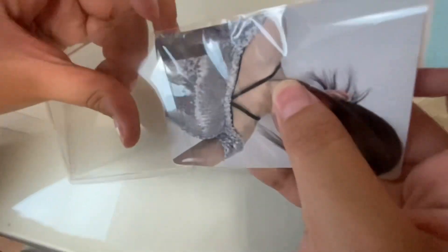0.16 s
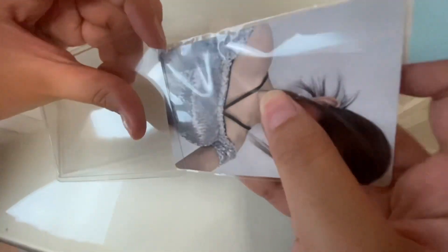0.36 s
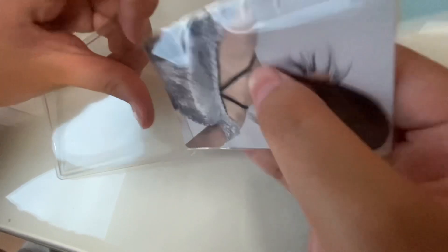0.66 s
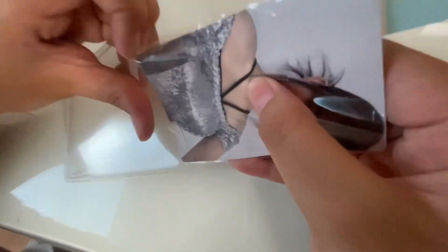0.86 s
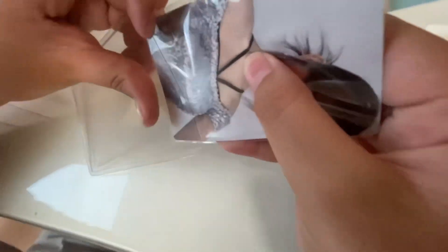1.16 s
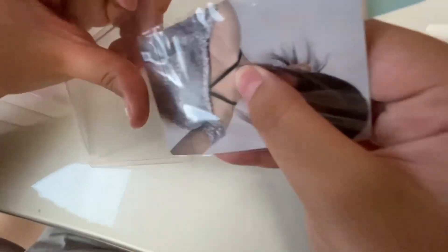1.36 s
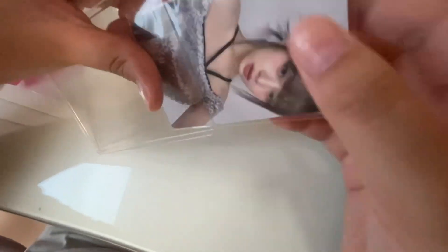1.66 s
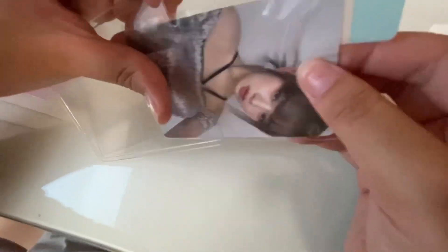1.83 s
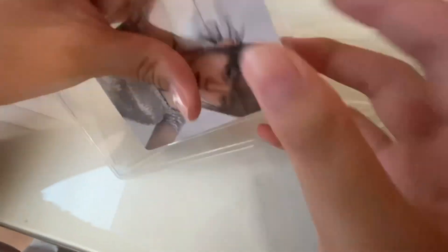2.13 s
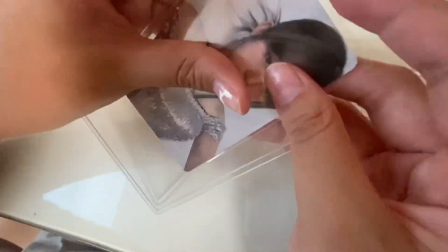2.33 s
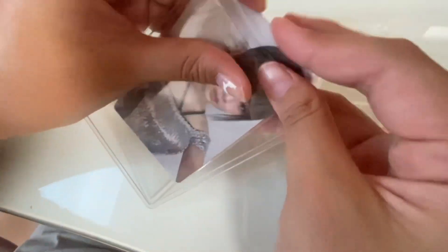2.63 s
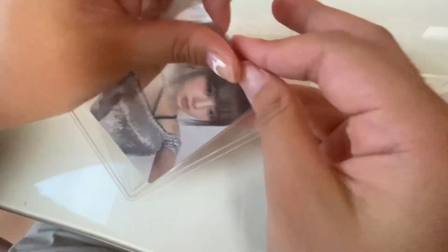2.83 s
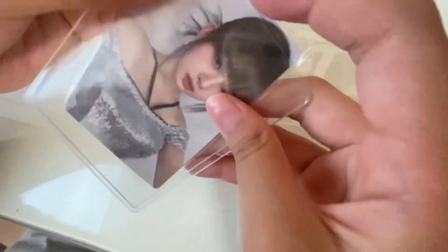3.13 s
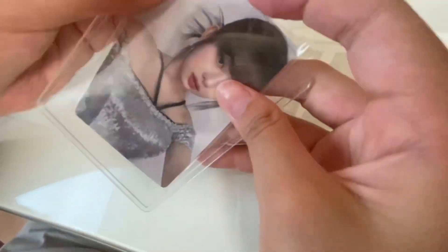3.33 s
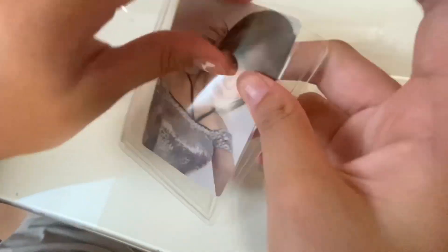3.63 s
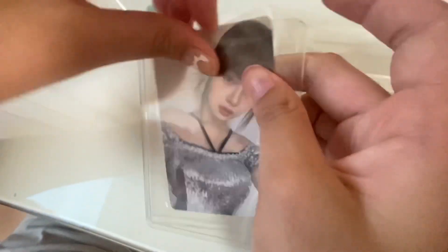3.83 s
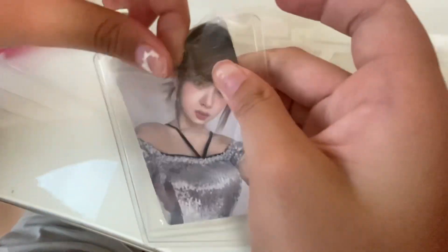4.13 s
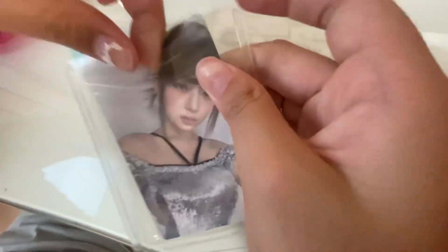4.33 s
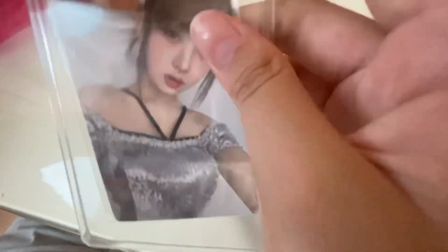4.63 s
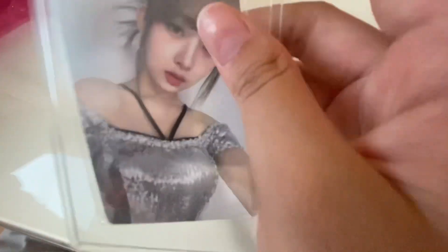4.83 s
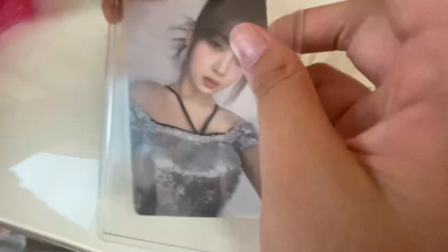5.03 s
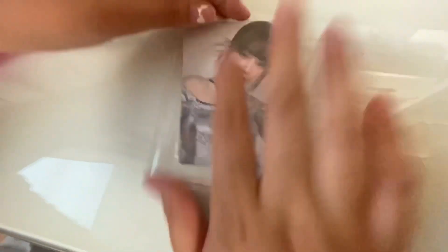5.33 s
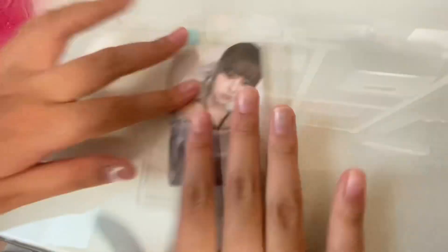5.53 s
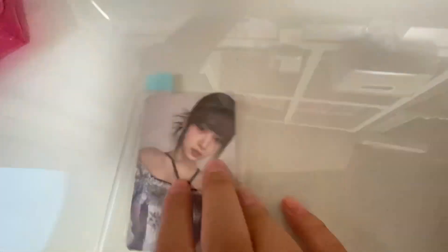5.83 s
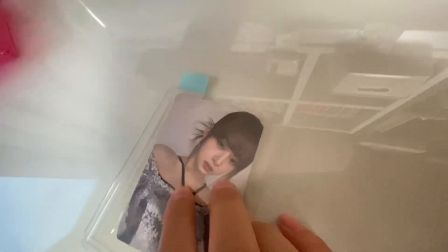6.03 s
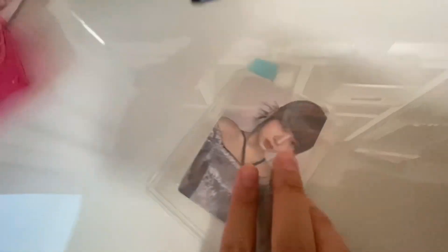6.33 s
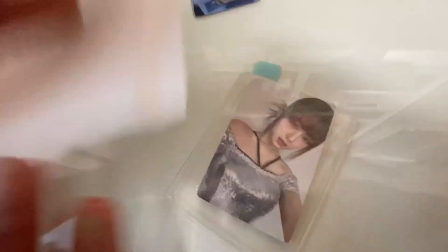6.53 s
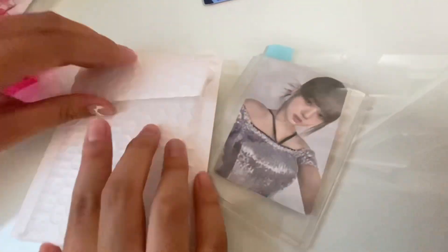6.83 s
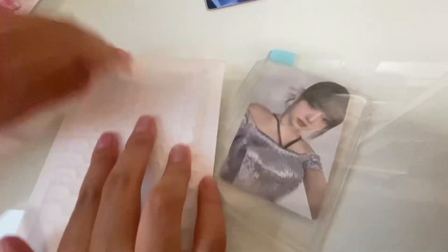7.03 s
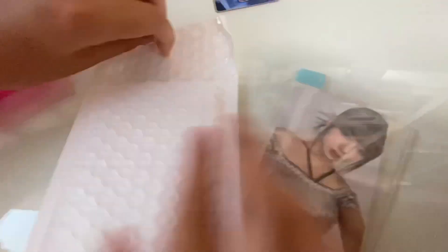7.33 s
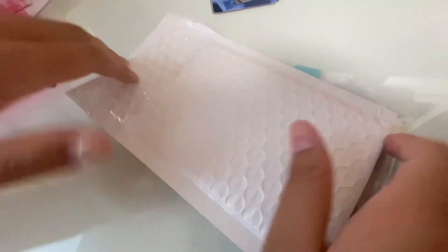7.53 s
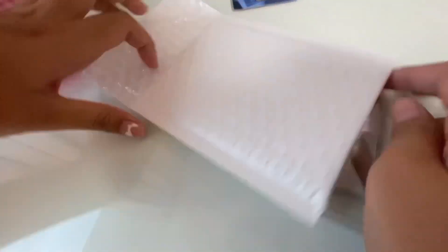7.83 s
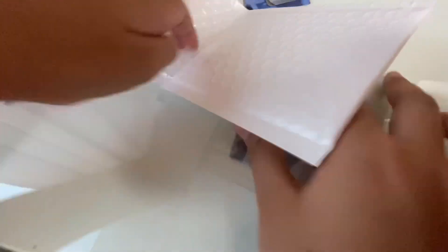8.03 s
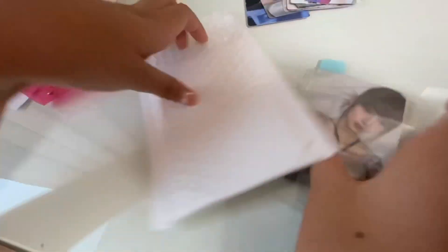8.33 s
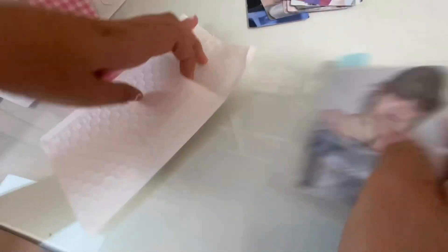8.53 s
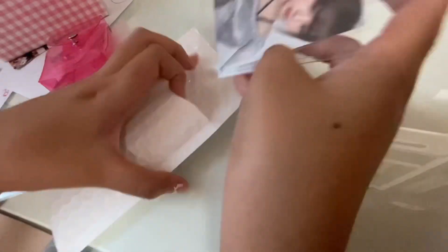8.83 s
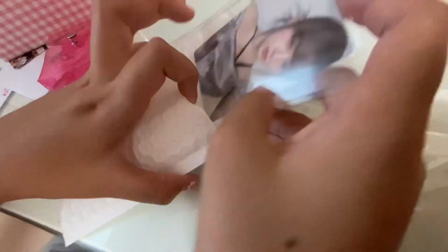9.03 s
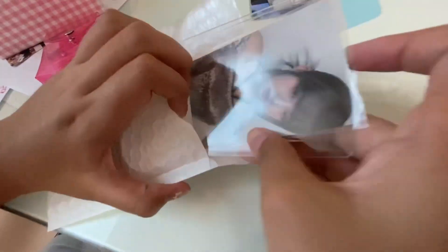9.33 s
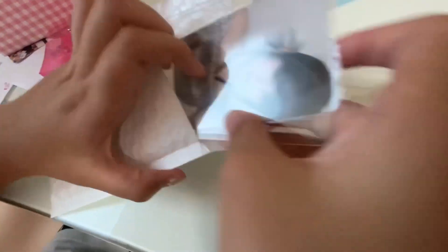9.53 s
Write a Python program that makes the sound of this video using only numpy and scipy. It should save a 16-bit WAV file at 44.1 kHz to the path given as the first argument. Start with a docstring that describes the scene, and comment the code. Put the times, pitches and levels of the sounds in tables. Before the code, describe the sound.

Thin film ticks and crackles under rubbing fingers, soft table thumps follow, then a padded bubble pouch pops loudly and rustles as something is pushed in.

```python
"""Creasing plastic, close to the two microphone ports of a camera: creases snap singly or buckle in quick runs
as hands work a card in a thin sleeve into a rigid holder, pat it down on a table, flip open a padded bubble
mailer and push the holder in. Snaps are short force curves on noise, coloured by the film's resonances.
Strokes rub as grainy filtered noise; squeaks, the sliding card and crackling bubbles ring from tiny slips or
buckles; thumps are decaying sines. Bumps, handling rumble, a low hum and a small room lie behind."""
import sys
import numpy as np
from scipy import signal
from scipy.fft import rfft, irfft, next_fast_len
from scipy.io import wavfile
from scipy.ndimage import map_coordinates

SR = 44100
rng = np.random.default_rng(int(sys.argv[2]) if len(sys.argv) > 2 else 0)


def generate_wav(signal):
    """Clip the signal to [-1, 1] and save it as 16-bit WAV at the path in sys.argv[1]."""
    frames = np.transpose(np.atleast_2d(signal))
    scaled = np.clip(frames, -1, 1) * 32767
    pcm = np.round(scaled).astype(np.int16)
    wavfile.write(sys.argv[1], SR, pcm)


N = 425992
TIME = np.arange(N) / SR
TOP_HZ = 16300  # band limit of the microphone chain


def amp(db):
    """Decibels to gain."""
    return 10 ** (np.asarray(db) / 20)


def unit(x):
    """x at rms 1."""
    return x / np.sqrt(np.mean(x ** 2) + 1e-20)


def along(points, hz):
    """Read (frequency, value) points on a log frequency axis."""
    f, v = np.transpose(points)
    return np.interp(np.log(hz + 1), np.log(f + 1), v)


def curve(rows):
    """Read (time, value) rows at every sample."""
    return np.interp(TIME, *np.transpose(rows))


def wobble(rate):
    """A smooth random curve, rate knots a second."""
    steps = np.arange(0, N / SR * rate + 1, 1 / 8)
    knots = rng.standard_normal(int(N * rate / SR) + 4)
    return np.interp(TIME * rate, steps, map_coordinates(knots, [steps]))


def arch(t, length):
    """Half a sine over the length, silence after it."""
    return abs(np.sin(np.pi * t / length)) * (t < length)


def add(track, s, sound):
    """Mix a stereo sound into the track at s seconds."""
    part = track[:, max(round(s * SR), 0):][:, :sound.shape[1]]
    part += sound[:, :part.shape[1]]


def colour(x, db_of_hz):
    """Filter with the given gain and minimum phase, so nothing sounds before its cause."""
    n = x.shape[-1]
    m = 2 * next_fast_len(n // 2 + 1024)
    cepstrum = irfft(np.log(amp(db_of_hz(np.fft.rfftfreq(m, 1 / SR)))))
    cepstrum[1:m // 2] *= 2  # fold the cepstrum onto positive time
    cepstrum[m // 2 + 1:] = 0
    return irfft(rfft(x, m) * np.exp(rfft(cepstrum)), m)[..., :n]


def band_db(hz, low_hz, low_power, high_hz, high_power):
    """Gain in dB that falls away below low_hz and above high_hz."""
    return -10 * np.log10((1 + (low_hz / (hz + 1)) ** low_power) * (1 + (hz / high_hz) ** high_power))


def delayed_right(sound, lead_s):
    """One sound at both ports, lead_s earlier on the left."""
    return np.array([sound, np.roll(sound, round(lead_s * SR))])


def ports(three, apart, lead_s):
    """A shared signal, earlier on the left, plus a part of its own for each microphone port."""
    return delayed_right(three[0], lead_s) + apart * three[1:]


def pan(db):
    """Left and right gains for a level difference."""
    return amp(np.array([db, -db]).reshape(2, -1) / 2)


# Spectrum of the still room's air: pitch_hz, gain_db
AIR = [(60, -1), (400, -2), (1300, -12), (10000, -27)]


def room_air(air_db=-70):
    """Noise of the still room, half shared between the two ports and half their own."""
    noise = ports(rng.standard_normal((3, N)), 0.97, 0)
    return amp(air_db) * unit(colour(noise, lambda hz: along(AIR, hz)))


def room_hum(hum_hz=92, hum_db=-70):
    """A faint room hum, unsteady in level and phase."""
    level = amp(hum_db + 5.2 * wobble(4.8))
    return level * np.sin(2 * np.pi * hum_hz * TIME + 2.8 * wobble(11.0))


# Low handling rumble, before its random waver: time_s, level_db
GRIP = [(0, -60.5), (5.28, -71), (5.38, -52), (5.66, -46), (5.8, -62), (6.4, -60.5), (7.6, -55.5),
        (9.66, -58.5)]
# Spectrum of that rumble: pitch_hz, gain_db
RUMBLE = [(40, -21), (65, -1), (92, 6), (140, -6), (250, -14), (500, -53)]


def handling_rumble(lead_s=.00027, waver_db=3.6):
    """Low noise of the handling, reaching the left port first, its level wavering."""
    noise = ports(rng.standard_normal((3, N)), 0.75, lead_s)
    rumble = unit(colour(noise, lambda hz: along(RUMBLE, hz)))
    return amp(curve(GRIP) + waver_db * wobble(14)) * rumble


def room(x, room_db=-16, t60_s=.165):
    """The small room's faint, short tail: decaying noise a few milliseconds behind the hands."""
    t = np.arange(SR // 2) / SR
    tail = rng.standard_normal((2, len(t))) * amp(-60 * t / t60_s)
    tail = np.pad(tail / np.linalg.norm(tail[0]), ((0, 0), (SR // 300, 0)))
    return amp(room_db) * signal.fftconvolve(x, tail, axes=1)[:, :N]


# Dull bumps that shake the camera, level before the arch is spread over its length: start_s, level_db, length_s
BUMPS = [(.675, -41, .05), (1.585, -39, .06), (2.83, -47, .06), (6.26, -34, .13)]


def bumps(edge_hz=170):
    """A nudge makes the camera shudder; its two ports face opposite ways and move out of phase."""
    out, t = np.zeros((2, N)), np.arange(SR // 4) / SR

    def dull(hz):
        return band_db(hz, edge_hz / 2, 4, edge_hz, 4) - 10 * np.log10(1 + (hz / 600) ** 6)

    for s, db, length in BUMPS:
        swell = np.sqrt(arch(t, length))
        shudder = unit(colour(swell * rng.standard_normal(len(t)), dull))
        add(out, s, np.array([[1], [-.75]]) * shudder * np.sqrt(length / t[-1]) * amp(db))
    return out


# Phase between the ports this close to the sheet: pitch_hz, phase_rad
NEAR = [(60, 1), (250, 0.55), (1000, 1.72), (2500, 0)]


def near_field(x):
    """So close to the sheet, the low mids reach the two ports out of step and favour the left."""
    m = next_fast_len(N + SR // 2)
    turn = along(NEAR, np.fft.rfftfreq(m, 1 / SR))
    steps = np.exp(np.array([[.5j], [-.5j]]) * turn)
    return irfft(rfft(x, m) * steps * pan(2 * turn - .5), m)[:, :N]


# Where the hands are, left over right before the near field: time_s, side_db
PLACE = [(0, 7.5), (2, 5), (4.4, 9.5), (5.4, 0), (6.7, 4), (8.3, 0.5), (9.66, 6)]


def lead_at(s, s_per_db=.00007):
    """Seconds by which the left port hears the hands first: more the further left they are."""
    return s_per_db * np.interp(s, *np.transpose(PLACE))


# Resonances of each plastic as it flexes: centre_hz, width_octaves, gain_db
SLEEVE_FILM = [(1650, .28, 3.5), (2900, .35, -2.5), (5500, .25, 1.5), (8700, .15, 3)]
HOLDER_SHELL = [(2200, .5, -2), (4720, .07, 7), (7000, .35, 3.5)]
MAILER_FLAP = [(760, .6, 6), (2650, .1, 4), (4960, .05, 6), (8200, .08, 4)]
MAILER_POUCH = [(3700, .25, 3), (15200, .12, 6)]
# Stages of the job, from card pressed down the sleeve to holder pushed into the mailer:
# start_s, rub_hz, scrape_edge_hz, resonances (a table above), snap_top_db (top octave at the usual body)
STAGES = [(0, 620, 8500, SLEEVE_FILM, 5), (2.8, 480, 3300, SLEEVE_FILM, -3),
          (4.35, 700, 3000, HOLDER_SHELL, -3), (5.52, 560, 3500, HOLDER_SHELL, -8),
          (6.5, 580, 4600, MAILER_FLAP, -2.5), (7.7, 480, 6200, MAILER_POUCH, -8),
          (8.7, 490, 4200, MAILER_POUCH, -4)]


def stage(s):
    """Rub resonance, scrape edge, resonances and snap top of the plastic being handled at s seconds."""
    return [row[1:] for row in STAGES if row[0] <= s or row is STAGES[0]][-1]


def sheet(hz, s):
    """Resonances of the plastic in hand at s seconds (dB)."""
    return sum(db * np.exp(-(np.log2((hz + 1) / centre) / octaves) ** 2 / 2)
               for centre, octaves, db in stage(s)[2])


def ragged(hz, depth_db):
    """Every new grip gives the sheet another set of broad resonances (dB)."""
    knots = np.geomspace(200, 16000, 44)
    return along(np.transpose([knots, depth_db * rng.standard_normal(len(knots))]), hz)


# Fingers thumping card and table, relative level and settled pitch: start_s, level_db, pitch_hz
THUMPS = [(.57, -39, 270), (.649, -39, 230), (.684, -30, 180), (1.612, -35, 114.3), (1.716, -34, 165),
          (2.115, -28, 235), (2.183, -37, 112), (2.974, -37, 100), (3.497, -40, 170), (3.535, -33.5, 181),
          (4.176, -41, 124.8), (4.657, -32.5, 205), (4.854, -39, 180), (5.347, -22, 88), (5.498, -23, 88),
          (5.603, -21.5, 84), (6.566, -35.5, 230), (7.079, -31, 96), (7.204, -37, 128), (7.364, -26, 112),
          (7.395, -33, 250), (7.959, -32.5, 114.7), (8.041, -34.5, 159), (8.118, -37, 130),
          (8.402, -32, 160), (9.044, -36, 185), (9.589, -30.5, 217.2)]
# Table-top modes, nominal because each thump shifts them a little: pitch_hz, level_db, t60_s
TABLE_MODES = [(57, -13, 0.24), (104.3, -8.5, 0.22), (194.4, -14, 0.25), (446, -17.5, 0.1),
               (593, -18, 0.15)]


def thumps(t60=0.068, rise_s=0.0025, table_db=-4, thump_db=2, bend=.5, settle_s=.006):
    """A soft fingertip swings the held plastic, sinking in pitch as it settles, and shakes the table."""
    out, t = np.zeros((2, N)), np.arange(SR // 3) / SR
    flesh_tone = [(40, -12), (110, 7.5), (300, -2.5), (700, -16.5), (2000, -32.0)]  # Hz, dB
    for s, db, hz in THUMPS:
        bent_time = t + bend * settle_s * (1 - np.exp(-t / settle_s))
        swing = np.sin(2 * np.pi * hz * bent_time) * amp(-60 * t / t60)
        table = 0
        for mode_hz, level, life in TABLE_MODES:
            decay = amp(level + rng.normal(0, 1.13) - 60 * t / life)
            table = table + decay * np.sin(2 * np.pi * mode_hz * rng.normal(1, 0.048) * t)
        noise = rng.standard_normal((2, len(t))) * amp(-60 * t / 0.055)
        flesh = unit(colour(noise, lambda f: along(flesh_tone, f)))
        blow = (swing + amp(table_db) * table + amp(-22) * flesh) * (1 - np.exp(-t / rise_s))
        add(out, s, blow * amp(db + thump_db))
    return out


def friction(size, lead_s, rate, grain_db, apart):
    """Sliding noise: a fine hiss with tiny catches of very uneven size, rate a second."""
    sizes = amp(5.5 * np.minimum(rng.exponential(size=size), 3.5))
    strength = (rng.random(size) < rate / SR) * sizes
    catches = signal.lfilter([1], [1, -np.exp(-1 / (.0004 * SR))], strength)  # each dies in 0.4 ms
    return ports(np.hypot(1, amp(grain_db) * catches) * rng.standard_normal((3, size)), apart, lead_s)


# Sliding strokes, levels before waver and trims: start_s, end_s, skin_db, plastic_db
STROKES = [(0, .27, -66, -71), (0.348, 0.76, -62, -67), (1.267, 1.62, -67, -59.5), (1.753, 2.1, -60, -57.5),
           (2.29, 2.444, -63, -67), (2.53, 2.801, -62, -56.5), (2.82, 3.07, -58, -61),
           (3.215, 3.271, -70, -67), (3.421, 3.739, -62, -66), (3.777, 4.323, -71.5, -68),
           (3.919, 4.096, -71, -62.5), (4.92, 5.1, -59, -68), (5.3, 5.36, -63, -56),
           (5.566, 5.717, -53, -60), (5.97, 6.19, -58, -55), (6.39, 6.55, -58.5, -65),
           (6.575, 6.853, -64, -56.5), (6.87, 7.022, -68, -53), (7.147, 7.471, -61, -53),
           (7.54, 7.66, -67, -61), (7.665, 7.985, -68, -56), (8.07, 8.5, -65, -53.5),
           (8.51, 8.96, -65, -56), (8.98, 9.352, -60.5, -55.5), (9.369, 9.492, -69, -59),
           (9.48, 9.657, -59, -54.5)]
# Top octave of the thin film: pitch_hz, gain_db
SHEEN = [(7000, -2), (13800, 0), (15300, 5.5)]


def rubbing(rub_db=1, scrape_db=0, waver_db=3):
    """In each stroke skin drones on the stiff card while plastic scrapes on plastic; the pressure wavers."""
    out, press = np.zeros((2, N)), (wobble(14) + wobble(55)) / np.sqrt(2)
    folds = wobble(130)
    for start, end, skin_db, plastic_db in STROKES:
        middle = (start + end) / 2
        skin_hz, edge_hz = stage(middle)[:2]
        edge_s = .014 + .11 * (end - start)  # longer strokes swell more gently
        t = np.arange(int((end - start + 4 * edge_s) * SR)) / SR - 2 * edge_s
        contact = (1 + np.tanh(1.4 * t / edge_s)) * (1 + np.tanh((end - start - t) / edge_s)) / 4

        def skin_tone(hz):
            return ragged(hz, 3) + band_db(hz, skin_hz / 1.9, 3, skin_hz, 6)

        def plastic_tone(hz):
            band = ragged(hz, 2.6) + band_db(hz, min(edge_hz / 2, 2200), 4, edge_hz, 3.5)
            return band + along(SHEEN, hz) + .4 * sheet(hz, middle)

        lead_s = lead_at(middle)
        skin = unit(colour(friction(len(t), lead_s, rate=46, grain_db=5.5, apart=0.52), skin_tone))
        scrape = friction(len(t), lead_s, rate=180, grain_db=-5.5, apart=1.0)
        plastic = unit(colour(scrape, plastic_tone))
        ridges = amp(2.3 * np.interp(start + t, TIME, folds))  # folds and bubbles catch and let go
        stroke = amp(skin_db + rub_db) * skin + amp(plastic_db + scrape_db) * unit(ridges * plastic)
        pressure = amp(waver_db * np.interp(start + t, TIME, press))
        add(out, start + t[0], contact * stroke * pressure)
    return out


def crackle(rate=520, burst_db=8.5, grain_hz=3900, octaves=.9, wander_octaves=.3, size_db=4.5, crackle_db=5.5):
    """The mailer's bubble walls crackle in uneven bursts: every tiny buckle rings for a few cycles."""
    out, t, cycles = np.zeros((2, N)), np.arange(SR // 125) / SR, 2.5
    mailer_from_s = 6.5
    chance = rate / SR * amp(burst_db * np.minimum(wobble(35), 2))
    buckles = TIME[rng.random(N) < chance]
    tension = np.interp(buckles, TIME, wander_octaves * wobble(20))  # shifts the pitch of neighbours together
    pitch_side = rng.standard_normal((len(buckles), 2))
    draws = np.column_stack([buckles, tension, pitch_side, rng.exponential(size=len(buckles))])
    for start, end, _, plastic_db in STROKES:
        if start > mailer_from_s:
            lead_s = lead_at(start)
            for s, taut, pitch, side, size in draws[(buckles > start) & (buckles < end)]:
                hz = min(grain_hz * 2 ** (taut + octaves * pitch), TOP_HZ)
                level = amp(plastic_db + crackle_db + size_db * min(size, 3)) * np.sqrt(hz / grain_hz)
                grain = np.sin(2 * np.pi * hz * t) * np.exp(-hz * t / cycles) * level
                add(out, s, delayed_right(grain, lead_s) * pan(2 * side))
    return out


# The card sliding home inside the rigid holder, level before the arch is spread over its length:
# start_s, level_db, length_s, tilt_db_per_octave, pitch_ratio (over the pocket's)
SLIDES = [(4.712, -60, .095, 1.3, 1.48), (4.89, -54, .22, -1, 1.03)]
# Resonances of the holder's pocket, before tilt and pitch ratio: pitch_hz, level_db
HOLLOW = [(533, 0), (770, -5), (1250, -9), (2280, -13), (3110, -15)]


def slides(t60=.02, slip_rate=1500, drift=.04):
    """Tiny slips of the sliding card ring the holder's narrow pocket, whose pitch sags as the card goes in."""
    out, t = np.zeros((2, N)), np.arange(SR // 3) / SR
    for s, db, length, tilt_db, pitch in SLIDES:
        slips = (rng.random(len(t)) < slip_rate / SR) * rng.standard_normal(len(t)) * arch(t, length)
        ring = 0
        for hz, level in HOLLOW:
            tilt = tilt_db * np.log2(hz / HOLLOW[0][0])
            ring = ring + amp(level + tilt - 60 * t / t60) * np.sin(2 * np.pi * pitch * hz * t)
        slide = signal.fftconvolve(slips, ring)[:len(t)]
        sagging_time = t + drift * t * (1 - t / length) / 2
        slide = unit(np.interp(sagging_time, t, slide)) * np.sqrt(length / t[-1]) * amp(db)
        add(out, s, delayed_right(slide, lead_at(s)))
    return out


# The holder sticking and slipping on the film, level before the arch is spread over its length:
# start_s, level_db, length_s, pitch_hz (centre of its modes)
SQUEAKS = [(2.79, -61, .3, 1800), (6.41, -57, .14, 800), (8.2, -51, .2, 5600), (8.397, -35.5, 0.018, 3700),
           (8.443, -40.5, 0.045, 2900), (9.001, -42, 0.026, 2162)]


def squeaks(slip_rate=450, t60=0.011, spread=.33, squeak_db=0, count=6):
    """Uneven slips of the holder's edge ring a few modes of the taut film, swelling and easing off."""
    out, t = np.zeros((2, N)), np.arange(SR // 3) / SR
    for s, db, length, hz in SQUEAKS:
        swell = np.sqrt(arch(t, length))
        slips = (rng.random(len(t)) < slip_rate / SR) * rng.standard_normal((count, len(t))) * swell
        pitch = hz * np.exp(spread * (np.linspace(-1, 1, count) + .3 * rng.standard_normal(count)))
        rings = np.sin(2 * np.pi * pitch[:, None] * t) * amp(-60 * t / t60)
        squeak = signal.fftconvolve(slips, rings, axes=1).sum(0)[:len(t)]
        squeak = unit(squeak) * np.sqrt(length / t[-1]) * amp(db + squeak_db)
        add(out, s, delayed_right(squeak, lead_at(s)))
    return out


# Spectrum of a bare crease: pitch_hz, gain_db
CREASE = [(90, -29.5), (200, -1), (620, 4), (950, -2), (1400, -1.5), (3200, -6), (7500, -7), (13800, -14.5),
          (15300, -5), (16500, -26)]


def film(force, s, body_db, top_db, apart, thin_db_per_octave=32):
    """Plastic film flexed by a force curve; each crease radiates with its own ragged spectrum."""
    lead_s = lead_at(s) * rng.uniform(.7, 1.3)
    burst = ports(force * rng.standard_normal((3, len(force))), apart, lead_s)
    # a crease with less body starts higher
    knee_hz = np.clip(1450 * 2 ** (-body_db / thin_db_per_octave), 1300, 6000)
    tint = [(900, body_db), (knee_hz, 0), (7000, 0), (11000, top_db)]
    return colour(burst, lambda hz: along(CREASE, hz) + along(tint, hz) + sheet(hz, s) + ragged(hz, 2))


# The slack sleeve crinkling as the card is worked along it, level of the smallest ticks: start_s, end_s, level_db
CRINKLES = [(.33, .85, -66), (1.26, 1.63, -60), (3.48, 4.1, -66)]


def crinkles(scatter_db=9, clump_s=.004, count=2, ticks_per_s=45):
    """Stray little creases tick one after another, each in a tiny clump, while the sleeve is slack."""
    out, t = np.zeros((2, N)), np.arange(SR // 25) / SR
    for start, end, db in CRINKLES:
        ticks = int((end - start) * ticks_per_s)
        for k, (when, size, tint) in enumerate(rng.random((ticks, 3))):
            s = start + (k + when) / ticks * (end - start)
            age = t - np.cumsum(rng.exponential(clump_s, count))[:, None] % .03
            force = amp(rng.normal(0, 5, count)) @ np.exp(-abs(age) / .0005)
            tick = unit(film(force, s, 4 - 12 * tint, 0, apart=0.34))
            add(out, s, tick * amp(db + scatter_db * size ** 2))
    return out


# Runs of buckling creases, relative level before it is spread over the length: start_s, level_db, length_s, body_db
CRUNCHES = [(1.059, -42, 0.014, 1), (1.311, -38.5, 0.0083, -4), (1.52, -40.5, 0.025, 0),
            (1.555, -29, 0.0091, 0), (1.582, -35, 0.014, 1), (2.109, -28, 0.01, 6), (2.935, -53, .05, 1),
            (3.535, -46.5, 0.025, 2), (4.636, -43, 0.015, -4), (5.175, -49.5, 0.016, -1),
            (5.338, -31, .011, -19), (5.485, -34, 0.0093, -14), (7.011, -32, 0.0049, -14),
            (7.023, -23, 0.013, -14), (7.034, -18.5, 0.0059, -2), (7.422, -17.5, .005, -9),
            (7.948, -42, 0.018, -4), (8.04, -39, 0.012, 2), (8.153, -48, .015, -2), (8.35, -46, .04, -28),
            (9.124, -47, .018, -8), (9.27, -51, .05, 1)]


def crunches(rate=600, crack_s=0.0007, scatter_db=5, bed=0.9, crunch_db=1):
    """Creases buckle in a tight run of uneven snaps over a steady bed of force that dies away."""
    out, t = np.zeros((2, N)), np.arange(SR // 10) / SR
    for s, db, length, body_db in CRUNCHES:
        count = int(rate * length) + 2
        when = (np.arange(count) + rng.random(count)) * length / count
        age = t - when[:, None]
        sizes = amp(scatter_db * rng.standard_normal(count))
        flips = sizes @ ((age > 0) * np.exp(-abs(age) / crack_s))
        force = flips + bed * np.exp(-np.maximum(t - length, 0) / 0.0054)
        run = unit(film(force, s, body_db, stage(s)[3], apart=0.29)) * np.sqrt(length / t[-1])
        add(out, s, run * amp(db + crunch_db))
    return out


# Single creases snapping, relative level; more body where a finger or the card backs the film:
# start_s (of the crack), level_db, body_db
SNAPS = [(.074, -36, -3), (.158, -35, 3), (.271, -37, -3), (.309, -29, -1.5), (.375, -33, -19),
         (.443, -33, -9), (.468, -24, -18), (.502, -34, -2), (.568, -27, 4), (.595, -32, -23),
         (.684, -27, -1), (.701, -31, -4), (.733, -35, -4), (.806, -30, -5), (.996, -21, -17),
         (1.001, -21, -13.5), (1.067, -15, -7), (1.22, -23, -13), (1.262, -18.5, -7.5), (1.312, -21, -14),
         (1.396, -27, -15.5), (1.41, -13, -17), (1.49, -21, -28), (1.554, -14, -10), (1.842, -24.5, -9),
         (1.884, -35, -2), (1.923, -28, -18), (1.942, -27, -12), (1.978, -14.5, -17), (2.031, -22, -20),
         (2.056, -11, -5), (2.117, -15, -12), (2.277, -44, -3), (2.41, -38, 4), (2.556, -36, 3),
         (2.674, -32, -12), (2.828, -34, -2), (2.947, -30, -8), (2.997, -37, -2), (3.538, -23.5, -10),
         (3.562, -33, -9), (3.661, -25.5, -28), (3.707, -31, -6), (3.84, -36, 0), (3.962, -31, -12),
         (3.984, -24, -10.5), (4.05, -27, -32), (4.087, -31, -2), (4.179, -36, 6), (4.295, -43, -12),
         (4.41, -20, -22), (4.547, -42, -7), (4.66, -21, -12), (5.022, -30, -1), (5.174, -27, -4.5),
         (5.345, -19, -12), (5.492, -16, -11), (5.594, -14.5, -18), (5.781, -32.5, -7), (6.138, -38, 4),
         (6.414, -35, 0), (6.565, -23, 1), (6.578, -27, 2), (6.651, -20, -4), (6.73, -21.5, -4),
         (6.859, -27, -22), (6.928, -24, -18), (6.994, -15, -35), (7.022, -8, -20), (7.036, -2, -7),
         (7.214, -23.5, 2), (7.284, -24.5, -23), (7.377, -11, -10), (7.39, -19, -16), (7.423, -7, -26),
         (7.66, -31, 0), (7.728, -27, -5), (7.781, -27, -22), (8.288, -15, -48), (8.754, -30, 0),
         (8.807, -30, -25), (9.044, -19, -4), (9.083, -22.5, 4), (9.33, -28, -5), (9.528, -29, -20),
         (9.588, -22, -4)]


def snaps(strain_db=-31, ring_s=0.0082, ring_db=-24, rebound_db=-12, snap_db=-22.5, usual_body_db=-10):
    """A crease strains, flips within a millisecond and rebounds; the sheet around it flutters briefly."""
    out, t = np.zeros((2, N)), np.arange(SR // 16) / SR - .007
    crack_s, dulling = .0005, .15  # dulling: dB of top lost for each dB of body
    side_db = curve(PLACE)
    for s, db, body_db in SNAPS:
        top_db = stage(s)[3] - dulling * (body_db - usual_body_db)
        flip = np.exp(-abs(t) / crack_s * np.where(t < 0, 2, 1))
        rebound_gain = amp(rebound_db + rng.normal(0, 9))
        rebound = rebound_gain * np.exp(-abs(t - rng.uniform(0.0016, 0.00593)) / crack_s)
        strain = amp(strain_db) * np.exp(-abs(t) / 0.006)
        flutter = amp(ring_db) * np.exp(-abs(t) / ring_s)
        force = flip + rebound + np.where(t < 0, strain, flutter)
        snap = unit(film(force, s, body_db, top_db, apart=0.68))
        add(out, s - .006, snap * amp(db + snap_db) * pan(side_db[round(s * SR)]))
    return out


def scene():
    """Everything happens at the hands, mostly a little to the left, over the room and the camera's bumps."""
    side_db = curve(PLACE)
    small_sounds = crunches() + squeaks() + slides() + crinkles() + crackle()
    broad_sounds = rubbing() + thumps()
    hands = near_field(snaps() + small_sounds * pan(side_db) + broad_sounds * pan(0.58 * side_db))
    return hands + room(hands) + bumps() + handling_rumble() + room_hum() + room_air()


def record(dry):
    """The camera drops the deepest bass, clips at full scale and cuts steeply above its band limit."""
    dry = signal.sosfilt(signal.butter(6, 46, "high", fs=SR, output="sos"), dry)
    m = next_fast_len(N + SR // 2)
    hz = np.fft.rfftfreq(m, 1 / SR)
    return irfft(rfft(np.clip(dry, -1, 1), m) / np.sqrt(1 + (hz / TOP_HZ) ** 120), m)[:, :N]


dry = scene()
out = record(dry)
generate_wav(out)
```